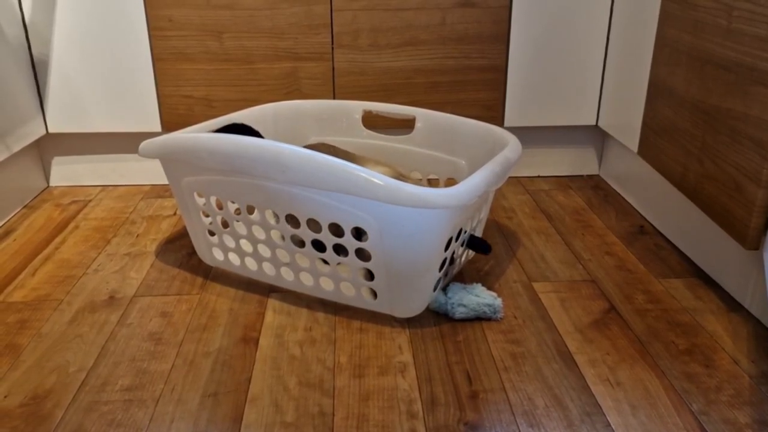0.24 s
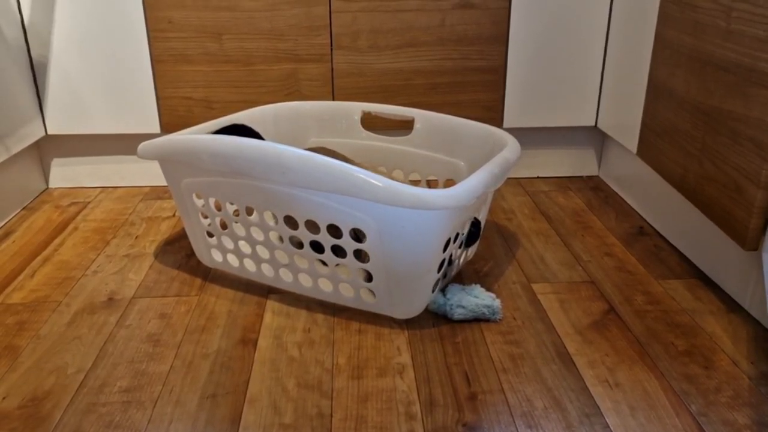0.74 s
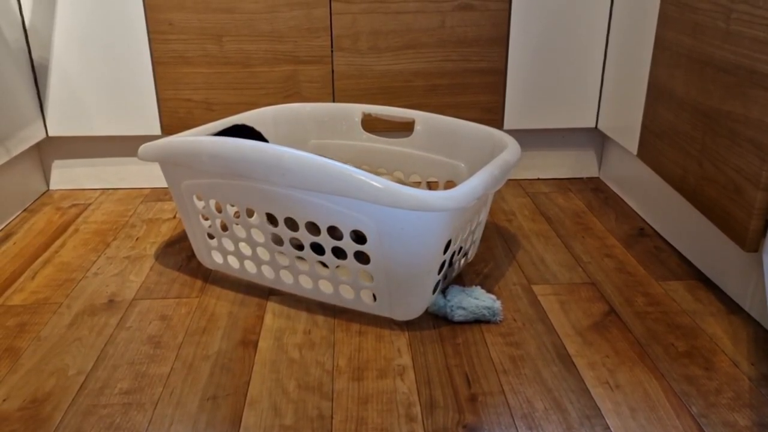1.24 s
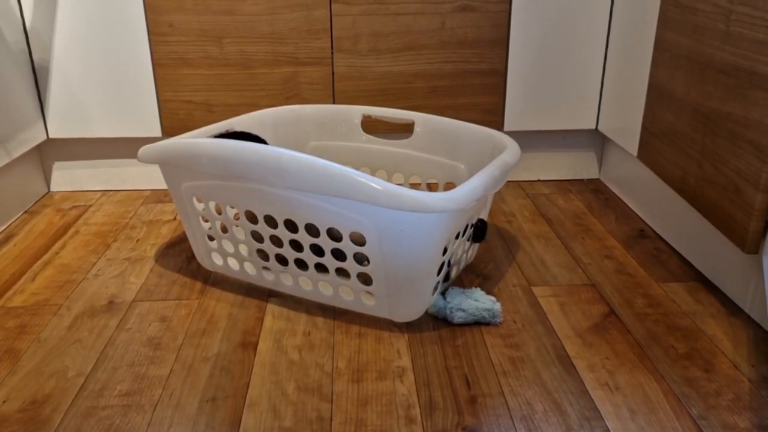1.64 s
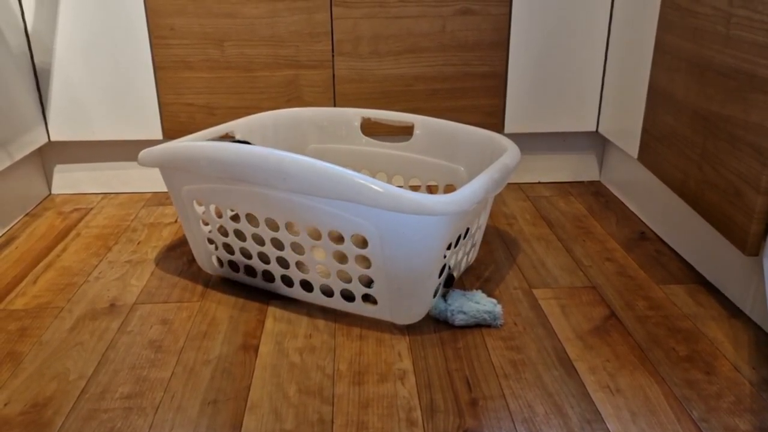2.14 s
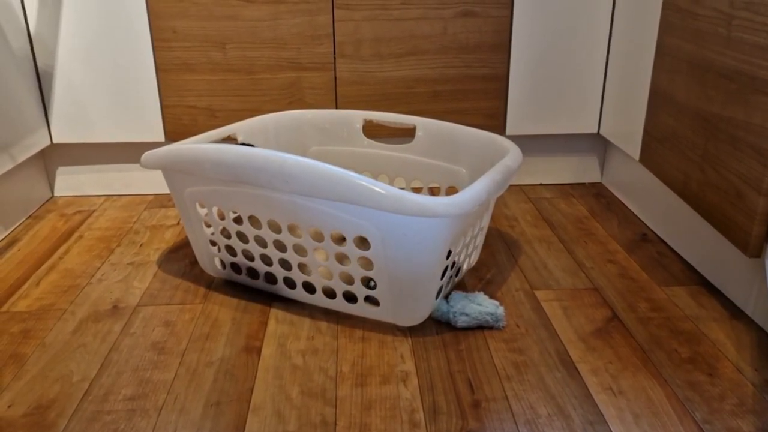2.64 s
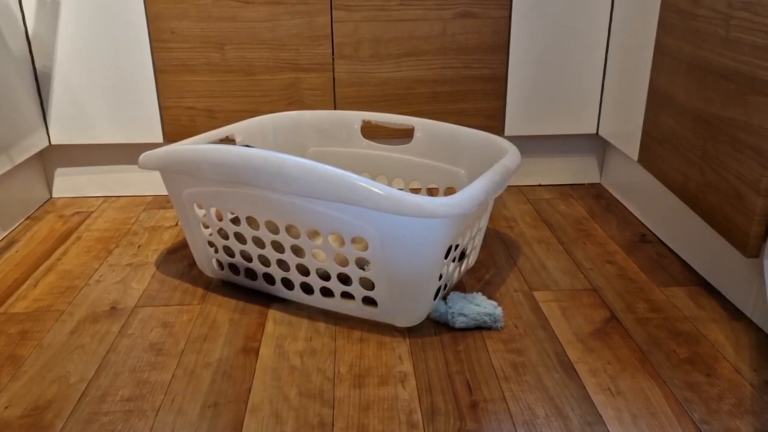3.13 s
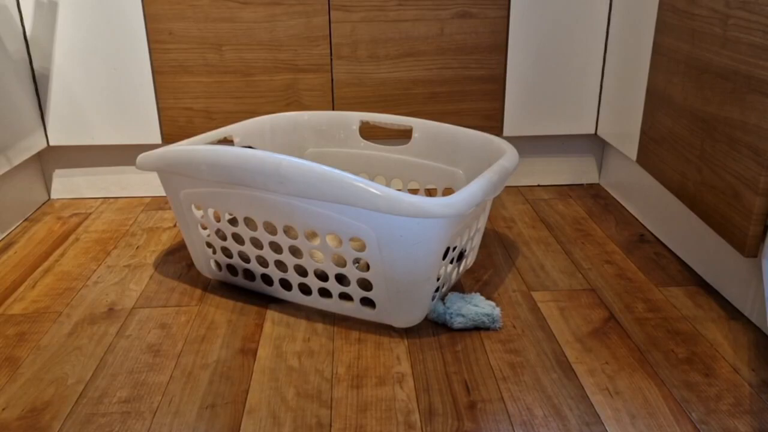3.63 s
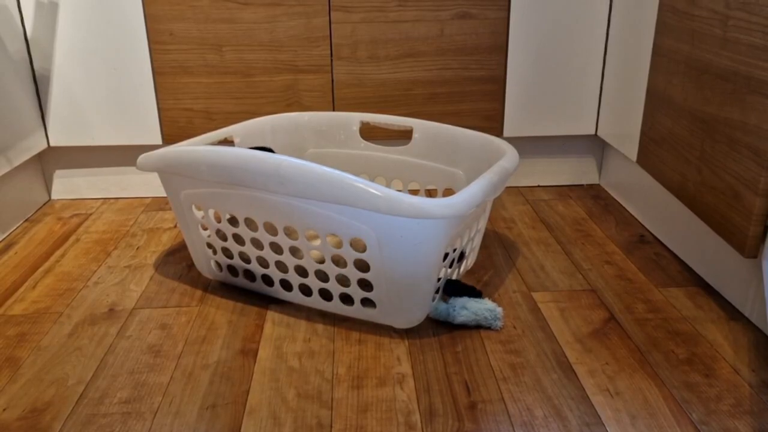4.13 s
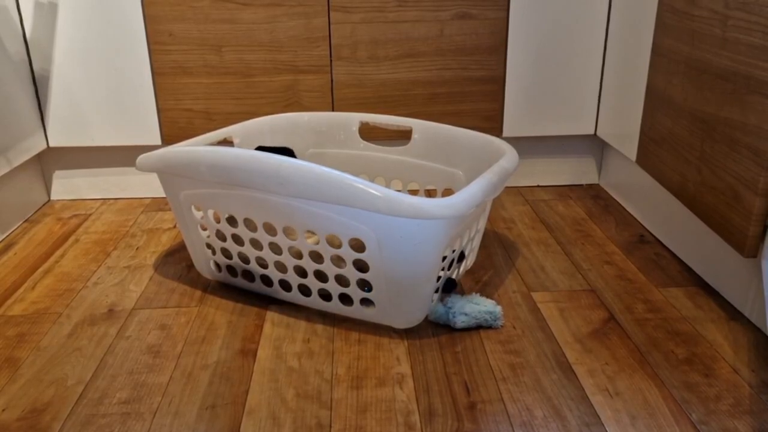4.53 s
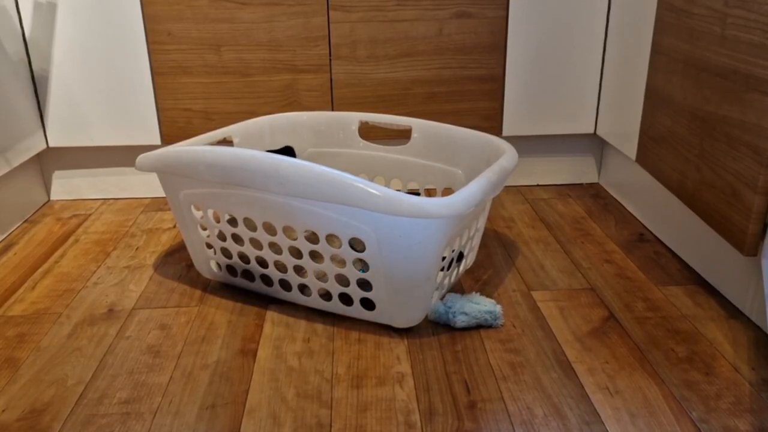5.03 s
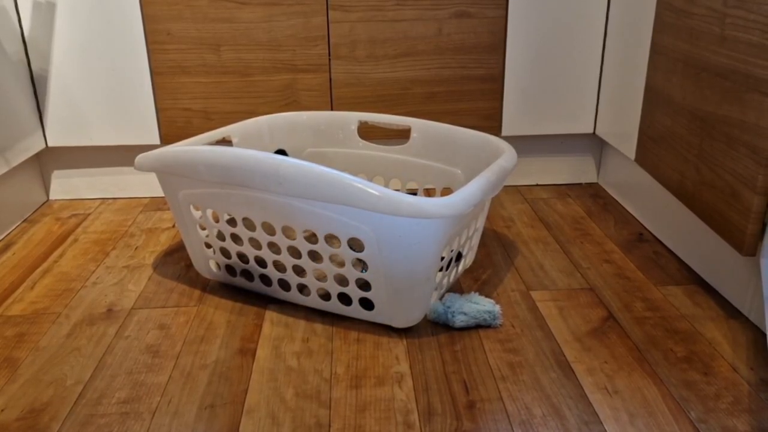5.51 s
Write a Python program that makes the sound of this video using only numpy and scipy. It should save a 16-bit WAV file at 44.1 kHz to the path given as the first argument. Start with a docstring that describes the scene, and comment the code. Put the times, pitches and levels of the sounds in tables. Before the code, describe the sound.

A quiet kitchen with a constant low appliance hum, faint thin whine and soft room air. Close in stereo, a cat scrabbles inside a thin plastic basket. Faint fur rubbing opens, then a sharp claw tap with a dry scratch at 0.43 s and a duller scrape with a basket knock at 0.8 s. The hardest click lands at 1.42 s, leading into a rapid cluster of taps, scrapes and low paw thumps until about 2.05 s, the heaviest thump near 1.74 s. More crisp scratches come at 2.4 and 2.7 to 2.9 s. It is nearly still from 3 to 3.5 s, then light clicks gather around 3.8 s. A tiny, very high bell tinkles barely audibly around 1 to 1.9 s and a little clearer, slightly right, at 4.15 s. Taps, rustles and soft thuds return from 4.5 to 5 s; afterwards mostly hum remains. Reflections are short and hard.

```python
"""Claws of a cat tap and scrape a plastic laundry basket: impulses and dying slips excite the wall's modes.
Fur and claws rub along it as stick-slip grains, and a tiny bell rings when its pellet rattles.
Decaying noise gives these sounds the reverberation of a hard kitchen.
Paws thump as low, sinking tones of the floor boards, with a knock of the basket base.
Below lies the hum of an appliance: noise in resonant bands, a thin whine and room air."""
import sys
import numpy as np
from scipy import signal
from scipy.fft import rfft, irfft, next_fast_len
from scipy.io import wavfile

SR = 44100
rng = np.random.default_rng(int(sys.argv[2]) if len(sys.argv) > 2 else 0)


def unload_wav(signal):
    """Save mono or channel-first audio to the path in sys.argv[1] as 16-bit WAV at rate SR, clipped to [-1, 1]."""
    wavfile.write(
        sys.argv[1],
        SR,
        np.round(np.clip(np.atleast_2d(signal).T, -1, 1) * 32767).astype(np.int16),
    )


N = 254456

# Claw strokes, peak levels before the bass cut and panning: (time [s], tip click [dB], scratch pitch [Hz],
# wall body [dB], body pitch [Hz], scratch [dB], bright edge [dB], left minus right [dB])
STROKES = [(0.1458, -63, 5870, -84, 633, -55.5, -78, -4.5), (0.2848, -61, 5430, -61, 1200, -55.5, -75, 6.5),
           (0.4346, -21.5, 4800, -34.5, 1560, -27.5, -31.5, 2),
           (0.821, -57, 2600, -35.5, 1220, -33, -43, 1.5), (1.0347, -46, 2360, -46, 1140, -51, -83, 6),
           (1.1081, -58, 4040, -59.5, 930, -59, -74, -9), (1.2313, -46.5, 4200, -58, 2170, -51, -76, 0.5),
           (1.423, -18.5, 3820, -42.5, 1040, -29.5, -43, 6.5),
           (1.4359, -29, 3420, -32.5, 2160, -28, -40, 0.5),
           (1.4762, -31.5, 3500, -40, 2160, -41, -58, -15.5),
           (1.5722, -40, 4200, -51.5, 991, -43.5, -48, -1.5), (1.6135, -49, 3800, -55, 1670, -61, -58, 14),
           (1.708, -63, 4950, -58, 1450, -55, -85, -3.5), (1.7248, -40, 2720, -39, 1430, -50, -79, 5),
           (1.7467, -40, 3900, -55, 980, -61, -85, -1.5), (1.7957, -42, 2800, -42, 2140, -40.5, -72, 3.5),
           (1.8393, -28, 3520, -46, 1730, -30.5, -32.5, 4), (2.0461, -41.5, 3630, -50, 1730, -55, -59, 1.5),
           (2.422, -30, 3650, -39, 1650, -32.5, -45.5, 1.5),
           (2.5426, -41.5, 3360, -56, 1130, -50, -85, 3.5), (2.6821, -34.5, 4520, -45.5, 1450, -36, -66, 2),
           (2.688, -43, 3320, -37.5, 1720, -37, -58, 4.5), (2.7995, -57, 4450, -69, 2060, -46, -65, 8),
           (2.8069, -31, 4850, -51, 1650, -37, -40.5, -1), (2.8769, -30, 3950, -51, 1460, -43, -43, 2),
           (3.1045, -55.5, 3550, -58, 2170, -57, -93, 7.5), (3.4993, -45, 6300, -86, 646, -69, -82, 5),
           (3.5422, -59, 3900, -60, 1540, -49.5, -78, 8), (3.5644, -45, 3630, -55.5, 1580, -49.5, -68, 0.5),
           (3.7981, -59, 3100, -47, 1470, -40, -87, 3), (3.8404, -32, 3500, -41, 2120, -39.5, -59, 1.5),
           (3.8455, -46, 3550, -44, 1450, -54, -64, 1), (3.857, -41, 3360, -55, 1680, -52, -75, 1.5),
           (3.9612, -47, 3540, -61, 635, -58, -90, 1.5), (3.9768, -55, 3500, -64, 627, -51, -90, 5.5),
           (4.0692, -43, 2530, -44, 1440, -48, -85, 1.5), (4.079, -58, 2350, -43, 780, -64, -75, 1),
           (4.135, -42.5, 3970, -58, 1430, -53, -55, 10.5), (4.146, -37, 5800, -64, 1340, -51, -45.5, -7.5),
           (4.4702, -55, 5370, -65, 622, -49.5, -90, 5.5), (4.539, -43, 3380, -68, 635, -49, -85, 4.5),
           (4.6487, -30.5, 5750, -40.5, 1970, -73, -45, 2),
           (4.7335, -33, 4160, -42.5, 2200, -38.5, -54, 0.5), (4.7932, -44.5, 2410, -68, 1980, -40, -84, 6),
           (4.8389, -36, 2860, -41, 990, -53, -81, 7.5), (4.866, -38, 2100, -47, 920, -66, -85, -2.5),
           (4.9683, -43, 2450, -43, 1470, -40, -56, 5)]
# Modes of the basket wall: (frequency [Hz], relative level [dB], 60 dB decay time [s])
WALL_MODES = [(770, -2, .04), (1000, -1, .02), (1220, 1, .022), (1450, 1, .02), (1680, 0, .016),
              (2050, 0, .016)]
SKID_RISE_S, SKID_T60_S = 0.0037, 0.038     # of a stroke whose stronger part, scratch or wall, is at -50 dB
SNAP_PER_DB = 0.025     # a harder stroke starts and ends sooner: exponent per dB
LAG_S_PER_DB = 0.00003     # the nearer port hears a stroke louder and sooner


def taps():
    """Impulse and friction excitation: a claw tip clicks, then its dying slips shake the wall modes."""
    out, t = np.zeros((2, N)), np.arange(SR // 4) / SR
    broad = signal.butter(4, [1800, 7000], "band", fs=SR, output="sos")
    bright = signal.butter(4, 8000, "high", fs=SR, output="sos")
    thin = signal.butter(3, 620, "high", fs=SR, output="sos")     # the thin wall radiates little bass
    luck = rng.standard_normal((len(STROKES), 2, len(t)))
    for stroke_row, (slips, sizes) in zip(STROKES, luck):
        s, click_db, hz, wall_db, wall_hz, scratch_db, edge_db, pan_db = stroke_row
        snap = np.exp(-SNAP_PER_DB * (max(scratch_db, wall_db) + 50))
        rise = SKID_RISE_S * snap
        fade = from_db(-60 * t / (SKID_T60_S * snap))
        skid = slips * from_db(6.05 * sizes) * (1 - np.exp(-t / rise)) * fade
        impulse = 1.0 * (t == 0)
        click = ring(ring(impulse, hz, 5 / hz), hz, 5 / hz)
        wall = np.zeros(len(t))
        for mode_hz, mode_db, mode_t60 in WALL_MODES:
            # modes near the struck spot's pitch answer most
            octaves_off = abs(np.log2(mode_hz / wall_hz))
            wall += from_db(mode_db - 22.3 * octaves_off) * ring(skid, mode_hz, mode_t60)
        # each stroke has its own scratch colour
        scratch = signal.sosfilt(broad, skid + 0.3 * ring(skid, hz, 2.0 / hz))
        edge = signal.sosfilt(bright, skid * fade ** 1.6)     # the bright edge dies first
        stroke = peak_at(click, click_db) + peak_at(wall, wall_db)
        stroke = stroke + peak_at(scratch, scratch_db) + peak_at(edge, edge_db)
        stroke = signal.sosfilt(thin, stroke)
        for port, side in zip(out, (.5, -.5)):
            add(port, s - side * pan_db * LAG_S_PER_DB, stroke * from_db(side * pan_db))
    return out


# Drags of paw and coat along the wall, rms levels at full pressure:
# (time of full pressure [s], hold [s], fur [dB], claw scrape [dB], fine fibre hiss [dB])
WALL_DRAGS = [(0.01, 0.075, -76, -75, -105), (0.15, 0.012, -71.5, -71, -90),
              (0.32, 0.096, -70.5, -67.5, -80), (0.493, 0.01, -66, -58, -82),
              (0.858, 0.013, -60.5, -62.5, -92), (0.96, 0.008, -67, -72.5, -99),
              (1.08, 0.048, -66, -66.5, -85), (1.28, 0.067, -91, -69.5, -95),
              (1.472, 0.021, -60, -53.5, -66.5), (1.618, 0.0067, -62, -64, -89),
              (1.74, 0.01, -62.5, -70, -91), (1.844, 0.049, -85, -49, -65), (1.95, 0.093, -59, -61.5, -77),
              (2.08, 0.057, -87, -71.5, -87), (2.2, 0.13, -81, -78, -94), (2.458, 0.01, -63, -62.5, -83),
              (2.59, 0.052, -71, -70, -93), (2.73, 0.015, -72, -70, -94), (2.8, 0.023, -83, -62, -74),
              (2.87, 0.018, -74, -58, -90), (3.12, 0.16, -89, -77, -105), (3.56, 0.041, -76, -68, -85),
              (3.65, 0.14, -84, -71, -82.5), (3.82, 0.08, -62.5, -65, -86), (4.069, 0.031, -64.5, -66, -85),
              (4.2, 0.023, -100, -74, -83), (4.4, 0.073, -99, -82.5, -102), (4.55, 0.045, -71.5, -68, -89),
              (4.65, 0.04, -66, -77, -98), (4.73, 0.046, -68, -66.5, -102),
              (4.83, 0.0065, -53.5, -62, -100), (4.97, 0.033, -68.5, -70, -88)]
PRESS_DB_PER_S, LIFT_DB_PER_S = 278, 193     # how fast a drag swells and fades
STILL_DB = [-84, -88, -104]     # rms of fur, scrape and hiss while the cat lies still


def pressure_db():
    """Power summation: drags swell, hold and fade at fixed rates and add in power over the rest level."""
    t = np.arange(0, N + 64, 64) / SR
    s, held, *levels = np.transpose(WALL_DRAGS)[:, :, None]
    swell = -PRESS_DB_PER_S * np.maximum(s - t, 0)
    fade = -LIFT_DB_PER_S * np.maximum(t - s - held, 0)
    curves = []
    for db, rest_db in zip(levels, STILL_DB):
        power = np.sum(from_db(db + swell + fade) ** 2, axis=0) + from_db(rest_db) ** 2
        curves.append(np.interp(np.arange(N) / SR, t, 10 * np.log10(power)))
    return curves


# Spectrum of soft fur: (frequency [Hz], relative density [dB per Hz])
FUR_SPECTRUM = [(150, -9), (400, -8), (900, -5.5), (1500, -5.5), (2500, -10), (4500, -37.5)]
# Spectrum of the claw scrape: (frequency [Hz], relative density [dB per Hz])
SCRAPE_SPECTRUM = [(700, -12), (1500, 0), (2500, -0.5), (4000, 1), (6300, 3.5), (8000, -4.5), (10000, -25),
                   (16000, -54)]
# Ribs between the holes: (frequency [Hz], mean relative level [dB], 60 dB decay time [s])
RIB_MODES = [(2200, -12, 0.024), (3420, -3, 0.0084), (4200, 4, 0.006), (5640, 10, 0.0085),
             (7440, -4.5, 0.0038)]


def rubbing():
    """Stick-slip friction: dense grains make soft fur, sharper claw scrape and fine fibre hiss."""
    fur_db, scrape_db, hiss_db = pressure_db()
    fur = colour(grains(4000, spread_db=2.0), FUR_SPECTRUM)
    slips = grains(5000, spread_db=4.0) * from_db(2.0 * drift(40))     # slips come in clumps
    ribs = np.zeros(N)
    for hz, db, t60 in RIB_MODES:
        # the paw wanders, so each rib answers now more, now less
        ribs += from_db(db + 3.1 * drift(13.0)) * ring(slips, hz, t60)
    # now and then a claw catches a rib
    slips = rms_one(slips + 0.55 * grains(70, spread_db=2.5))
    scrape = rms_one(colour(slips, SCRAPE_SPECTRUM) + 0.25 * rms_one(ribs))
    # separate grains at each port spread the hiss over the whole coat
    fibres = np.array([grains(8000, spread_db=1.5) for port in "LR"])
    hiss = colour(fibres, [(6000, -36), (8500, 1.5), (12000, 12.5), (16000, -4.5)])     # (Hz, dB per Hz)
    return from_db(fur_db) * fur + from_db(scrape_db) * scrape + from_db(hiss_db) * hiss


# Paw thumps, peak levels: (time [s], floor [dB], nominal pitch [Hz], knock of the basket base [dB])
PAW_THUMPS = [(0.427, -44, 154.4, -54), (0.799, -46, 158.6, -37), (1.048, -41.5, 93, -73),
              (1.426, -37.5, 102, -43), (1.57, -55, 173, -54), (1.615, -53, 143, -49),
              (1.736, -31.5, 124, -44), (1.942, -37, 114, -60), (2.03, -43.5, 85, -47.5),
              (2.657, -49, 87, -61), (4.078, -51, 119, -49), (4.534, -49, 107, -58),
              (4.646, -48.5, 120.4, -56), (4.82, -48, 123, -71), (4.978, -43.5, 134, -61)]
# Modes of the basket base: (frequency [Hz], relative level [dB], 60 dB decay time [s])
BASE_MODES = [(241, 6.5, 0.033), (356, -4.5, 0.12), (490, -14, 0.13)]
BOARD_T60_S = 0.18


def thumps():
    """Damped oscillation: a soft paw makes the boards swell and ring low; the basket base knocks above."""
    out, t = np.zeros(N), np.arange(SR // 2) / SR
    swell = (1 - np.exp(-t / 0.0027)) ** 2 * from_db(-60 * t / BOARD_T60_S)
    soft = t * np.exp(-t / 0.00024)     # force of a padded contact
    for s, floor_db, hz, knock_db in PAW_THUMPS:
        pitch = hz * (.75 + 0.49 * np.exp(-t / 0.017))     # the pitch sinks as the weight settles
        boards = swell * np.sin(2 * np.pi * np.cumsum(pitch) / SR)
        knock = sum(from_db(db) * ring(soft, mode_hz, t60) for mode_hz, db, t60 in BASE_MODES)
        joists = swell * np.sin(2 * np.pi * 52 * t)
        add(out, s, peak_at(boards, floor_db))
        add(out, s, peak_at(knock, knock_db))
        add(out, s + 0.012, peak_at(joists, floor_db - 10.5))     # the joists answer late and lower
    return out


# Shakes of the bell: (time [s], strength of the pellet hits [dB])
BELL_SHAKES = [(0.944, -61), (0.99, -62.5), (1.103, -61.5), (1.373, -66.5), (1.522, -63), (1.5758, -66),
               (1.7489, -78), (1.9101, -60), (4.151, -53), (4.3809, -78), (4.433, -89), (4.825, -88)]
# Modes of the bell shell: (frequency [Hz], relative level [dB], 60 dB decay time [s])
SHELL_MODES = [(12150, -1, .04), (11270, -43.5, 0.058), (11540, -8, 0.018), (11900, -21, 0.026),
               (12900, -46, 0.027), (13250, -25, .04)]
RATTLE_S = 0.029     # decay time constant


def bell():
    """Modal ringing: a loose pellet rattles for a moment after each shake and excites the shell's modes."""
    t, pellet = np.arange(SR // 4) / SR, np.zeros(N)
    size = (len(BELL_SHAKES), len(t))
    hits = rng.standard_normal(size) * (rng.random(size) < 1200 / SR)     # 1200 hits a second
    envelope = (1 - np.exp(-t / 0.007)) * np.exp(-t / RATTLE_S)
    for (s, db), rattle in zip(BELL_SHAKES, hits):
        first_hit = 0.45 * (t == 0)
        add(pellet, s, from_db(db) * (first_hit + rattle * envelope))
    shell = sum(from_db(db) * ring(pellet, hz, t60) for hz, db, t60 in SHELL_MODES)
    # too small to radiate much lower sound
    return signal.sosfilt(signal.butter(2, [11000, 14000], "band", fs=SR, output="sos"), shell)


# Reverberation of the kitchen: (frequency [Hz], 60 dB decay time [s])
KITCHEN_T60 = [(200, 0.13), (1000, 0.27), (4000, 0.27), (7000, 0.21), (12000, 0.17)]
ROOM_DB = 0     # gain of the reflections


def kitchen(x):
    """Reverberation as convolution: floor and cupboard reflections are noise that dies band by band."""
    t, tail = np.arange(SR // 2) / SR, 0
    white = rng.standard_normal((2, 2, SR // 2))     # unrelated at the two ports
    edges = 150 * 2.0 ** np.arange(8)     # octave bands, Hz
    for k, (low, high) in enumerate(zip(edges, edges[1:])):
        octave = signal.butter(2, [low, high], "band", fs=SR, output="sos")
        band = signal.sosfilt(octave, white[k % 2])     # neighbouring bands get unrelated noise
        tail = tail + band * from_db(-60 * t / at_hz(KITCHEN_T60, np.sqrt(low * high)))
    tail = tail * np.clip((t - .002) / 0.0024, 0, 1)     # the first echo needs a longer path
    tail = tail / np.sqrt(np.sum(tail ** 2) / 2)     # mean energy 1 per port
    return signal.fftconvolve(x, tail, axes=1)[:, :N]


# Likeness of the noise at the two ports: (frequency [Hz], correlation [0 to 1])
PORT_LIKENESS = [(30, 0.84), (90, 1), (180, 0.97), (350, 0.57), (1000, 0.3), (8000, 0.07)]


def wide_noise():
    """Spatial coherence: two-channel noise is alike in the bass and looser in the treble."""
    size = next_fast_len(N)
    hz = np.maximum(np.fft.rfftfreq(size, 1 / SR), 1)
    alike = np.clip(at_hz(PORT_LIKENESS, hz), 0, 1)
    mid, side = rfft(rng.standard_normal((2, size)))
    ports = np.sqrt(1 + alike) * mid + np.sqrt(1 - alike) * side * [[1], [-1]]
    return rms_one(irfft(ports, size)[:, :N])


# Cabinet resonances: (frequency [Hz], bandwidth [Hz], rms level [dB])
CABINET = [(59.7, 18, -65), (93.4, 15.5, -56), (149.9, 19.2, -59), (177, 9.8, -67), (637, 21, -79),
           (1704, 180, -85.5), (3500, 130, -92), (5500, 880, -87), (7460, 710, -89)]
# Spectrum of the room air: (frequency [Hz], relative density [dB per Hz])
AIR_SPECTRUM = [(15, -58), (25, -42), (38, -24), (92, 17), (120, -54), (161, -38), (217, 0), (624, 0.5),
                (988, -36), (1700, -63), (2160, -33), (3520, -60), (16000, -85)]
AIR_DB = -72.5     # rms
WHINE_HZ, WHINE_DB = 1668, -83     # pitch; peak level about which the whine drifts


def hum():
    """Resonance filtering: motor noise sounds through a cabinet, with a thin whine and faint room air."""
    white = wide_noise()
    out = from_db(AIR_DB) * colour(wide_noise(), AIR_SPECTRUM)
    for hz, width_hz, db in CABINET:
        band = signal.butter(2, [hz - width_hz / 2, hz + width_hz / 2], "band", fs=SR, output="sos")
        out = out + from_db(db) * rms_one(signal.sosfilt(band, white))
    whine = np.sin(2 * np.pi * WHINE_HZ * np.arange(N) / SR)
    return out + from_db(WHINE_DB + 1.5 * drift(8)) * whine


def from_db(db):
    """Level definition: decibels to amplitude gain."""
    return 10 ** (np.asarray(db) / 20)


def rms_one(x):
    """Power normalisation: scale to unit rms."""
    return x / np.sqrt(np.mean(x ** 2) + 1e-20)


def peak_at(x, db):
    """Peak normalisation: scale a short sound to a peak level."""
    return from_db(db) * x / np.abs(x).max()


def at_hz(points, hz):
    """Logarithmic frequency: interpolate a table on a log-frequency axis."""
    return np.interp(np.log(hz), np.log(np.array(points)[:, 0]), np.array(points)[:, 1])


def colour(x, spectrum):
    """Spectral shaping: weight a dense sound by a spectrum; rms 1."""
    size = next_fast_len(N)
    hz = np.maximum(np.fft.rfftfreq(size, 1 / SR), 1)
    return rms_one(irfft(rfft(x, size) * from_db(at_hz(spectrum, hz)), size)[..., :N])


def ring(clicks, hz, t60):
    """Damped resonator: a unit click sets a decaying sine of starting height about 1 ringing."""
    r, w = from_db(-60 / (t60 * SR)), 2 * np.pi * hz / SR
    return signal.lfilter([0, np.sin(w)], [1, -2 * r * np.cos(w), r * r], clicks + 1e-18)


def grains(per_s, spread_db):
    """Random impulse process: slips of uneven size and either sign; rms 1."""
    sizes = from_db(spread_db * np.minimum(rng.exponential(1, N), 5)) * rng.choice([-1, 1], N)
    return rms_one(sizes * (rng.random(N) < per_s / SR))


def drift(per_s):
    """Slow random modulation: random points joined by lines."""
    steps = np.arange(N) * per_s / SR
    return np.interp(steps, np.arange(400), rng.standard_normal(400))


def add(out, s, sound):
    """Superposition: mix a short sound in at a time."""
    i = round(s * SR)
    out[..., i:i + sound.shape[-1]] += sound[..., :N - i]


def scene():
    """Superposition: claws, rubbing and bell with their reverberation, then the thumps and the hum."""
    basket = taps() + rubbing() + bell() * from_db([[-3], [3]])     # the bell lies to the right
    return basket + from_db(ROOM_DB) * kitchen(basket) + thumps() + hum()


# Colour of the left port against the right: (frequency [Hz], level difference [dB])
PORT_COLOUR = [(200, 0.15), (1000, 1), (2500, 1.4), (4500, -5), (8000, -1), (12000, -3)]
CUTOFF_HZ = 16600


def record(dry):
    """Linear filtering: the two ports differ a little in colour, and the top is cut steeply."""
    size = next_fast_len(N)
    hz = np.maximum(np.fft.rfftfreq(size, 1 / SR), 1)
    tilt_db = at_hz(PORT_COLOUR, hz) * [[.5], [-.5]]
    ports = irfft(rfft(dry, size) * from_db(tilt_db), size)[:, :N]
    return signal.sosfilt(signal.cheby2(14, 60, CUTOFF_HZ, fs=SR, output="sos"), ports)


dry = scene()
out = record(dry)
unload_wav(out)
```